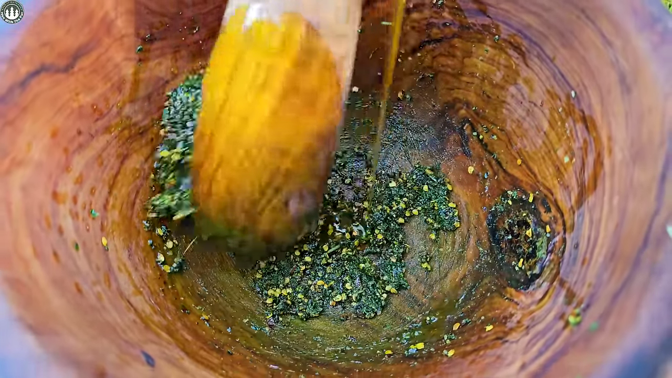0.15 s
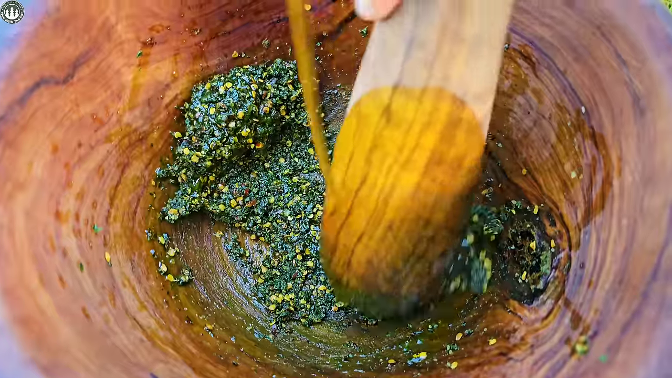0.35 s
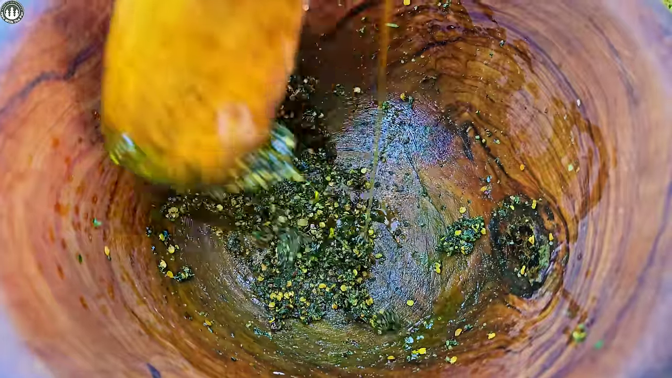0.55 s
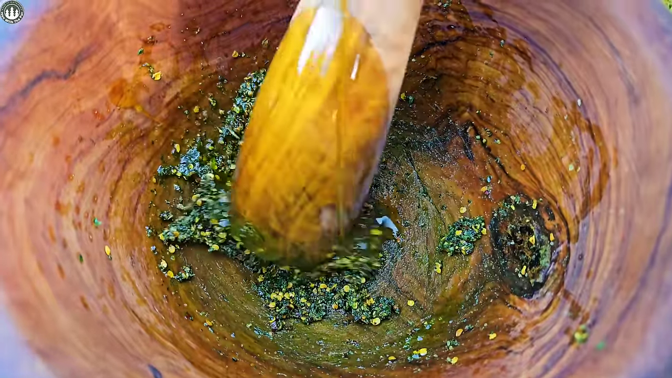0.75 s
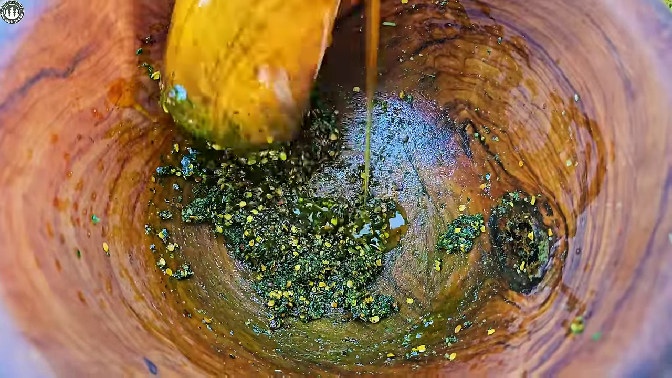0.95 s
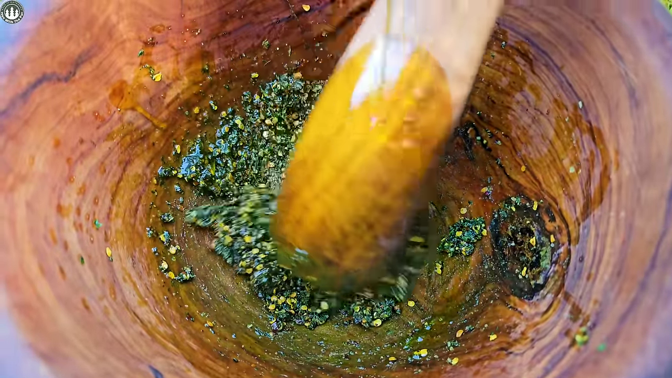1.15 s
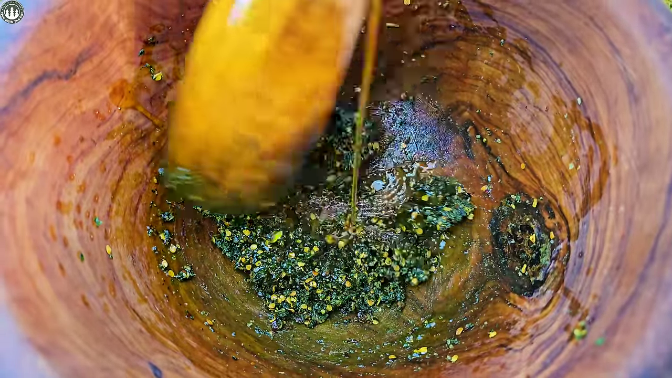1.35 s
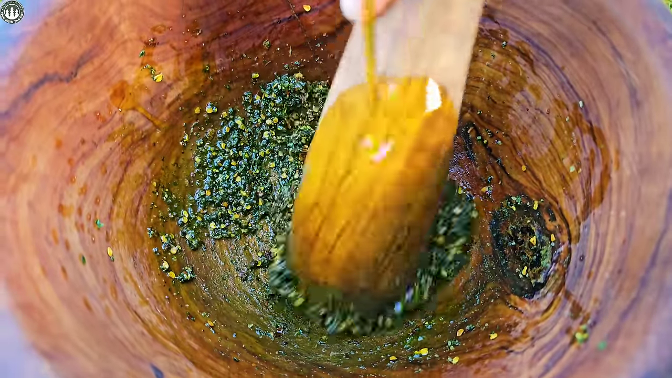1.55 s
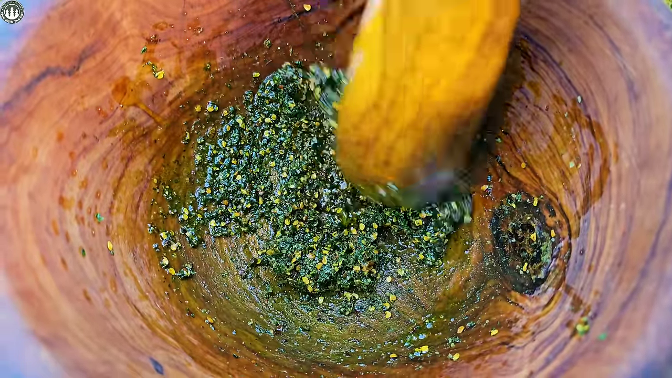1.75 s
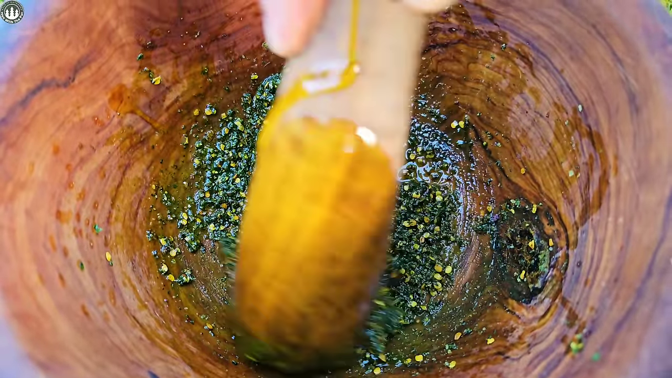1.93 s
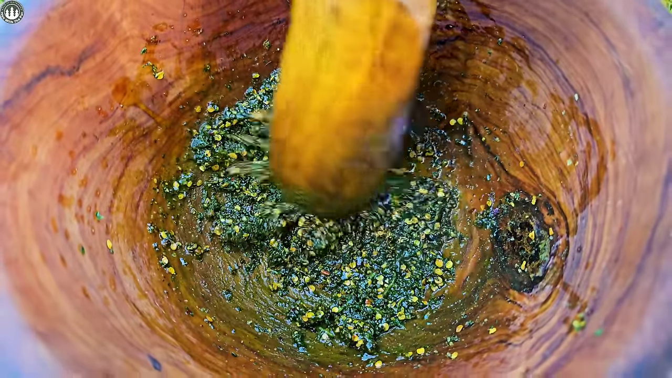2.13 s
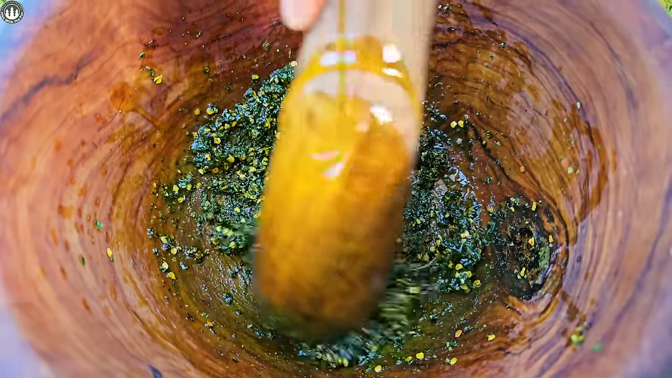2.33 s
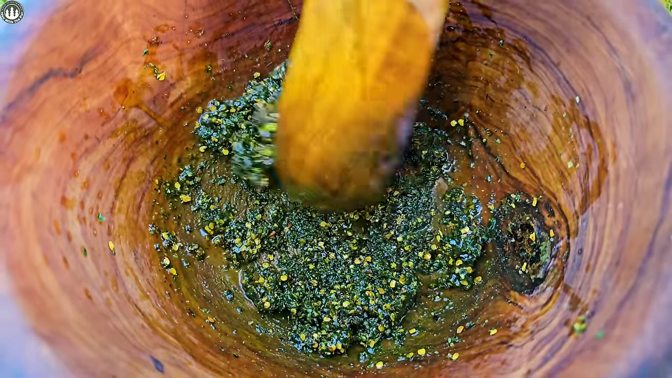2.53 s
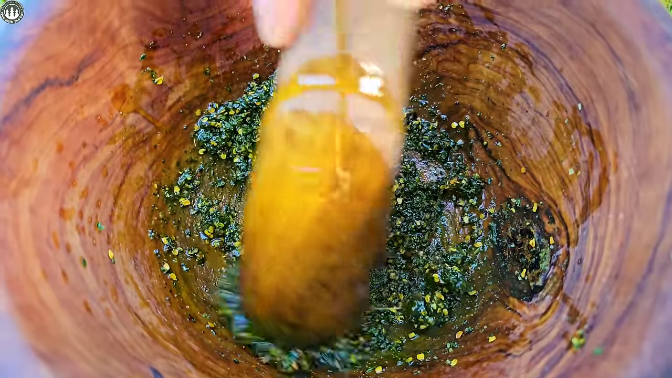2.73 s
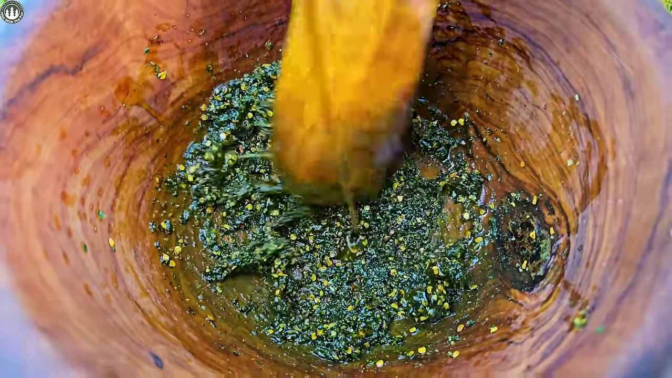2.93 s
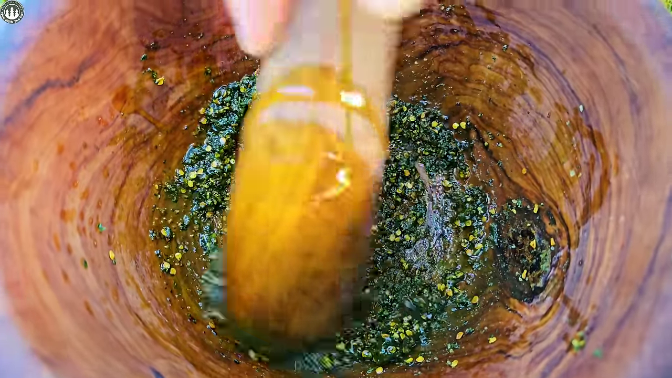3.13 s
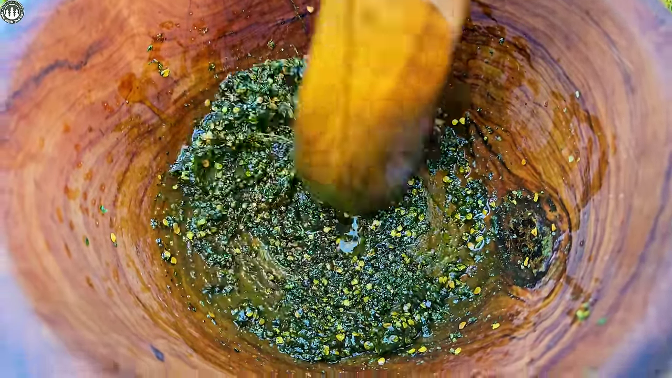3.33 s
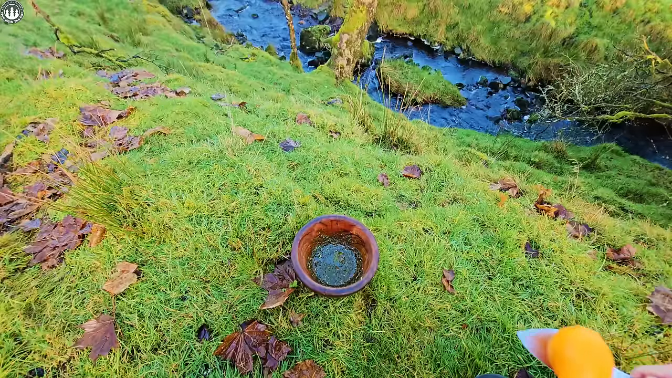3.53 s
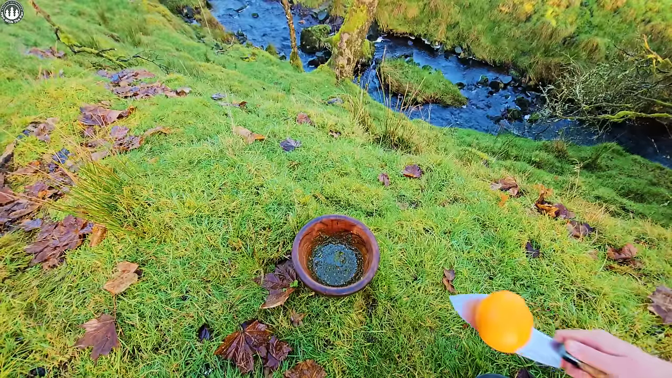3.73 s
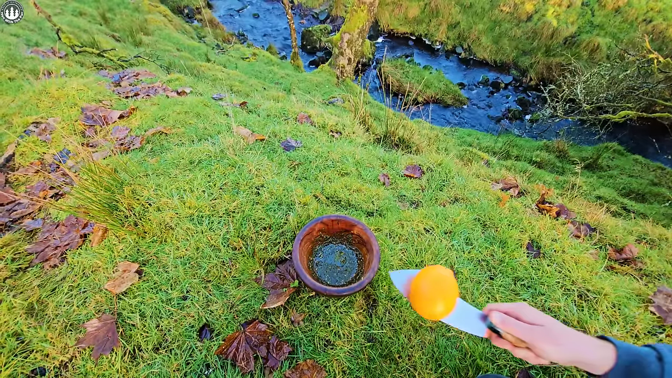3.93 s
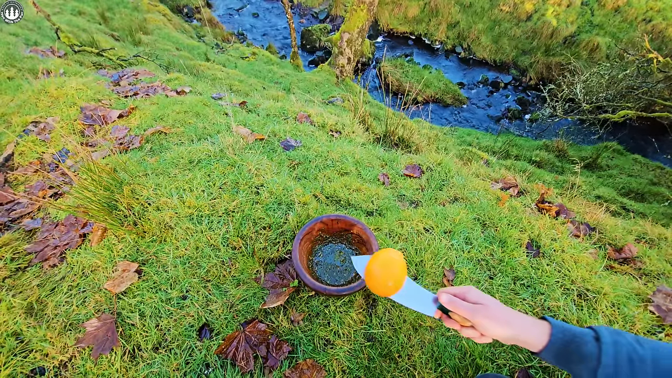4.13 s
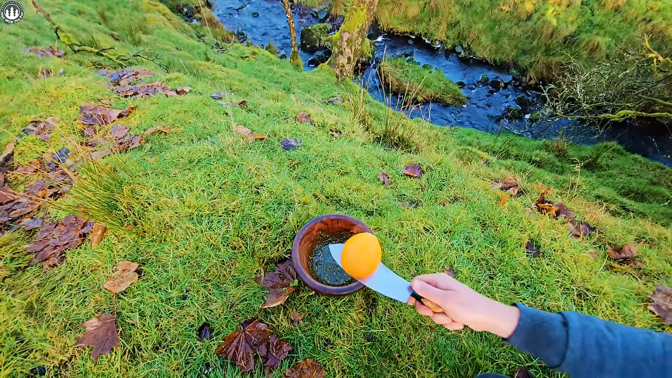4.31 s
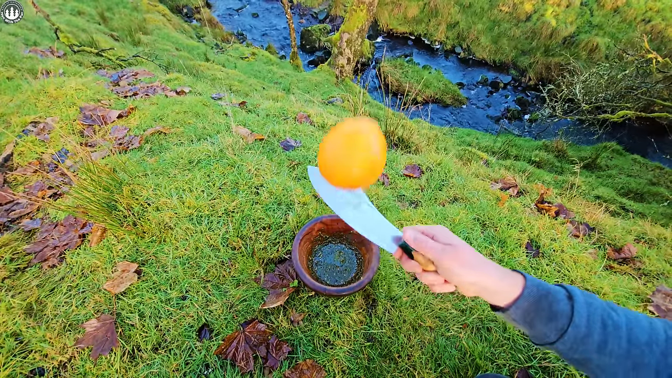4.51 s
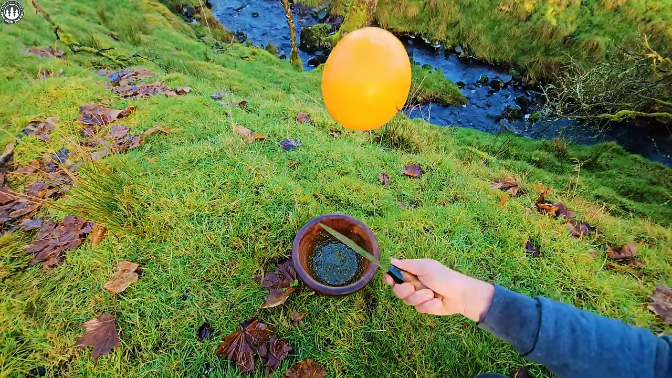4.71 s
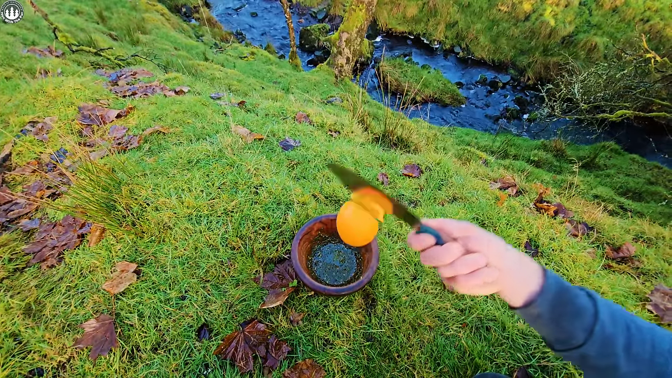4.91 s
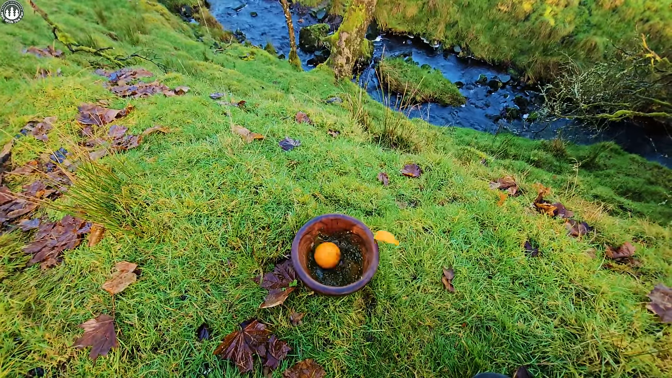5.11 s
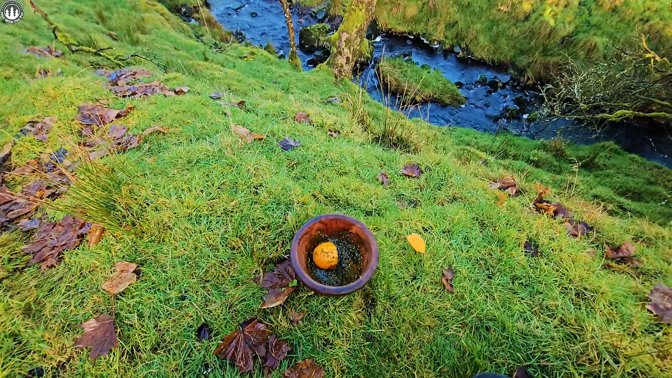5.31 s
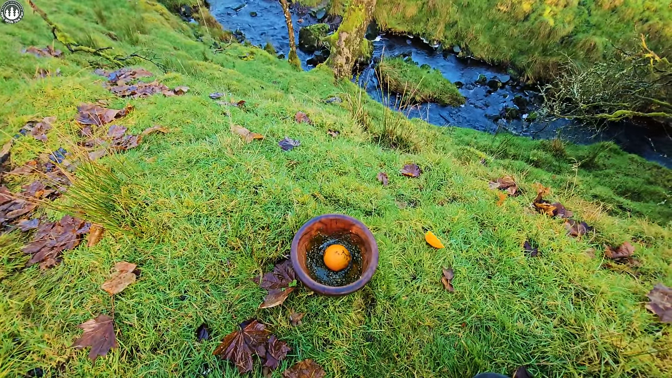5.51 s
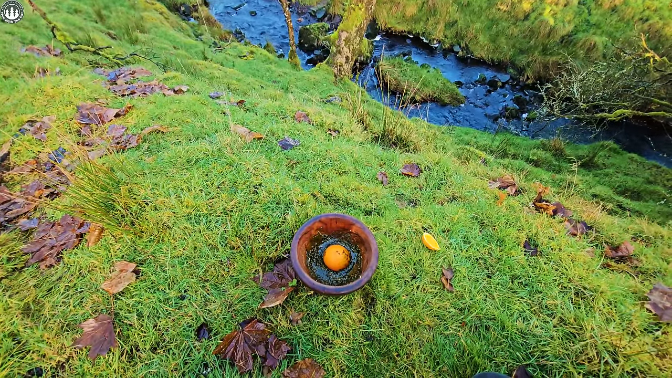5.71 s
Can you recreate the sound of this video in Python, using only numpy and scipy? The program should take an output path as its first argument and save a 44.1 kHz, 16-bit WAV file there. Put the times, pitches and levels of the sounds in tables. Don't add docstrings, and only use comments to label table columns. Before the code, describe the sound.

Outdoors beside a small brook, close-miked irregular grinding: short rough scrapes, soft hollow bumps, cracking seeds and three harder wooden knocks early on. After the pestle lifts, only water rush and low gulps remain for over a second. A wet, snappy fruit cut follows, then a plop into the bowl with light taps, then water alone.

```python
import sys
import numpy as np
from scipy import signal
from scipy.fft import rfft, irfft, next_fast_len
from scipy.io import wavfile
from scipy.ndimage import uniform_filter1d, map_coordinates

SR = 44100
rng = np.random.default_rng(int(sys.argv[2]) if len(sys.argv) > 2 else 0)


def unload_wav(signal):
    wavfile.write(
        sys.argv[1],
        SR,
        np.round(np.clip(np.atleast_2d(signal).T, -1, 1) * 32767).astype(np.int16),
    )


def gain_from_decibels(decibels):
    exponent = np.asarray(decibels, float) / 20
    return 10 ** exponent


N = 258418
TIME_S = np.arange(N) / SR
LEFT_LAG_S = -14 / 44100
HALVES = np.array([[.5], [-.5]])


def unit(x):
    return x / np.sqrt(np.mean(x ** 2) + 1e-20)


def along(points, hz):
    f, value = np.transpose(points)
    return np.interp(np.log(hz + 1), np.log(f + 1), value)


def over_time(points):
    s, value = np.transpose(points)
    return np.interp(TIME_S, s, value)


def wobble(rate_hz):
    knots = rng.standard_normal(N // 100 + 4)
    return map_coordinates(knots, [np.arange(N) * min(rate_hz, 400) / SR])


def filtered(x, response):
    m = next_fast_len(N + 8192)
    return irfft(rfft(x, m) * response(np.fft.rfftfreq(m, 1 / SR)), m)[..., :N]


def shaped(x, points):
    return filtered(x, lambda hz: gain_from_decibels(along(points, hz)))


def modes(table):
    def response(f):
        total = 0
        for k, (hz, width_hz, db) in enumerate(table):
            damping = 1j * f * width_hz
            total = total + (-1) ** k * gain_from_decibels(db) * damping / (hz * hz - f * f + damping)
        return total
    return response


def grit(count, spread_db):
    train = np.zeros((2, N))
    uneven = np.minimum(rng.exponential(size=(2, count)), 4)
    size = rng.standard_normal((2, count)) * gain_from_decibels(spread_db * uneven)
    np.put_along_axis(train, rng.integers(N, size=(2, count)), size, axis=1)
    return unit(train)


def separately(table, count, spread_db, rate_hz, depth_db):
    total = 0
    for hz, width_hz, db in table:
        swell = gain_from_decibels(db + depth_db * wobble(rate_hz))
        b, a = signal.iirpeak(hz, hz / width_hz, SR)
        total = total + swell * signal.lfilter(b, a, grit(count, spread_db))
    return total


def lagged(pair, lag_s):
    return filtered(pair, lambda hz: np.exp(-2j * np.pi * hz * lag_s * HALVES))


def stereo(pair, alike, side, lag_s):
    def share(hz):
        turn = np.arccos(np.clip(along(alike, hz), -1, 1)) / 2
        return np.array([np.cos(turn), np.sin(turn)])
    mid, diff = filtered(pair, share)
    ports = filtered(np.array([mid + diff, mid - diff]), lambda hz: gain_from_decibels(HALVES * along(side, hz)))
    return lagged(ports, lag_s)


def onset(t, attack_s):
    return 1 - np.exp(-t / attack_s)


def ring(t, hz, t60_s, attack_s):
    return np.sin(2 * np.pi * hz * t) * gain_from_decibels(-60 * t / t60_s) * onset(t, attack_s)


def burst(t, hz, width, t60_s):
    noise = rng.standard_normal((3, len(t)))
    force = (noise[0] + 1.02 * noise[1:]) * gain_from_decibels(-60 * t / t60_s) * onset(t, 0.000067)
    force[:, 4:9] += 1.6
    f = np.fft.rfftfreq(len(t), 1 / SR)
    sound = irfft(rfft(force) * modes([(hz, width * hz, 0)])(f), len(t))
    return sound / np.abs(sound).max()


def add(out, s, sound):
    start = round(s * SR)
    out[..., start:start + sound.shape[-1]] += sound[..., :N - start]


# hz, likeness; hz, left_right_db
NEAR_ALIKE = [(100, 1), (600, 1), (1500, 0.051), (4000, 0.058), (12000, 0.05)]
NEAR_SIDE = [(60, 5.5), (110, 2), (200, 5), (380, 5.5), (700, 3.5), (1290, 3), (2380, 5.5), (4400, 4),
             (8120, 11), (15000, 10)]
# hz, db_per_hz
PUSH_SPECTRUM = [(12, -37), (20, -10), (80, 6), (124, 3), (151, 5.5), (293, -1.5), (380, -5), (490, -4),
                 (840, -120)]
CRUNCH_SPECTRUM = [(530, -52), (900, -53), (1190, -7.5), (1660, -14.5), (2170, 1.5), (2420, -8),
                   (3730, -2.5), (7770, -11.5), (10500, -20), (14900, -13), (16000, -14)]
# hz, width_hz, level_db
WOOD_MODES = [(1190, 120, -0.5), (1854, 350, -3.5), (2200, 110, 3), (2490, 55, -1), (3100, 260, -2),
              (3580, 200, -4), (4400, 730, -9.5)]
WET_POPS = [(3000, 240, 4.5), (3530, 1500, 3), (4800, 720, 0.5), (7500, 460, 2.5), (9900, 2400, -2.5)]
# time_s, crunch_db
PASTE = [(0, 2), (.5, 4), (1.2, -2), (1.6, 4), (1.9, 2.5), (2.3, -0.5), (2.6, -0.5), (3, -3.5), (3.5, 0.5)]
LIFT_S = 3.575


def grinding():
    slide_db, weight_db = strokes()
    judder = wobble(27.7)

    push = shaped(grit(count=3000, spread_db=-2.0), PUSH_SPECTRUM)
    push = unit(push * gain_from_decibels(2.0 * judder + 1.3 * wobble(9.9)))
    bowl = filtered(grit(count=5000, spread_db=2.5), modes([(530, 82, 12), (666, 150, -12.5)]))
    bowl = unit(bowl * gain_from_decibels(2.2 * judder))
    scrape = separately(WOOD_MODES, count=5000, spread_db=2.8, rate_hz=18, depth_db=4.2)
    scrape = unit(scrape * gain_from_decibels(1.8 * judder))
    rasp = unit(shaped(grit(count=25000, spread_db=-0.5), CRUNCH_SPECTRUM))
    pops = unit(separately(WET_POPS, count=2500, spread_db=2, rate_hz=22, depth_db=3.5))
    crunch = unit((rasp + .85 * pops) * gain_from_decibels(1.3 * judder + 1.3 * wobble(120)))

    push_db, scrape_db, crunch_db = -2.5, -0.5, -0.5
    grip_db, settle_db = -46, -52
    crunch_drive_db = 0.42 * (slide_db + 40) - 40
    push_level = np.hypot(gain_from_decibels(push_db + weight_db), gain_from_decibels(grip_db))
    crunch_level = np.hypot(gain_from_decibels(crunch_db + over_time(PASTE) + crunch_drive_db), gain_from_decibels(settle_db))
    pair = push_level * push + gain_from_decibels(weight_db) * bowl
    pair = pair + gain_from_decibels(slide_db + scrape_db) * scrape + crunch_level * crunch

    fade = np.clip((LIFT_S - TIME_S) / 0.0096, .22, 1) * (TIME_S < LIFT_S + .065)
    for s, *_ in KNOCKS:
        fade *= 1 - 0.14 * np.exp(-((TIME_S - s + 0.048) / 0.0084) ** 2)
    return stereo(fade * pair, NEAR_ALIKE, NEAR_SIDE, LEFT_LAG_S)


# start_s, length_s, slide_db, weight_db
STROKES = [(-.02, 0.066, -38, -34), (0.061, 0.075, -34, -39), (0.125, 0.03, -43.5, -48),
           (0.153, 0.038, -35.5, -44), (0.185, 0.043, -38, -43.5), (0.223, 0.081, -47.5, -45.5),
           (0.294, 0.036, -28.5, -27.5), (0.333, 0.057, -34.5, -33.5), (0.407, 0.064, -47, -44.5),
           (0.749, 0.074, -37.5, -41), (0.858, 0.044, -42, -59), (1.112, 0.089, -38, -43),
           (1.197, 0.085, -45, -45), (1.25, 0.06, -35, -31), (1.472, 0.2, -49, -45),
           (1.674, 0.082, -53, -41.5), (1.786, 0.064, -67, -54), (1.826, 0.035, -42, -47),
           (1.854, 0.055, -44.5, -46), (1.907, 0.057, -45.5, -42), (1.943, 0.085, -48, -47),
           (2.029, 0.072, -39, -36.5), (2.092, 0.034, -33.5, -34), (2.137, 0.069, -43, -42),
           (2.202, 0.06, -37.5, -42.5), (2.256, 0.06, -36.5, -38.5), (2.325, 0.043, -40.5, -44),
           (2.375, 0.056, -53, -54), (2.429, 0.1, -45, -52), (2.521, 0.026, -40, -46),
           (2.558, 0.039, -47, -47.5), (2.596, 0.07, -38.5, -44.5), (2.667, 0.08, -36, -41.5),
           (2.727, 0.04, -43.5, -40.5), (2.772, 0.038, -47, -52), (2.802, 0.054, -42, -49.5),
           (2.839, 0.097, -38, -41), (2.907, 0.084, -42, -45.5), (2.983, 0.036, -39, -37.5),
           (3.009, 0.051, -32, -34.5), (3.073, 0.047, -37.5, -39), (3.116, 0.066, -41, -39.5),
           (3.192, 0.045, -44, -45), (3.242, 0.021, -32, -32), (3.27, 0.11, -42.5, -42),
           (3.34, 0.032, -35.5, -38), (3.381, 0.07, -42, -39), (3.436, 0.052, -36, -34.5),
           (3.486, 0.17, -37.5, -34.5)]


def strokes():
    attack_s, release_s = 0.025, 0.036
    s, length, slide_db, weight_db = np.transpose(STROKES)[..., None]
    t = np.arange(0, N, 32) / SR
    rise = (t - s) / attack_s + .5
    fall = (s + length - t) / release_s + .5
    shape = np.clip(np.minimum(rise, fall), 0, 1) ** 2
    levels = []
    for db in (slide_db, weight_db):
        power = np.sum((shape * gain_from_decibels(db)) ** 2, axis=0)
        levels.append(np.interp(TIME_S, t, 10 * np.log10(power + 1e-9)))
    return levels


def bass_cut(pair):
    return filtered(pair, lambda hz: 1j * hz / (45 + 1j * hz))


# start_s, bowl_hz, bowl_db, crack_db, thud_db
KNOCKS = [
    (0.6759, 474, -15, -6, -3.5),
    (1.0416, 489, -4.5, -21, -2.5),
    (1.4726, 473, -20, -20, -1.5),
]
# hz, level_db, t60_s
STRUCK = [
    [(1144, -23, 0.03), (1530, -14, 0.013), (2000, -1, 0.012), (2330, -9, 0.009), (3000, -3, 0.013),
     (3500, -10, 0.015), (4650, -16, 0.011)],
    [(800, -0.5, 0.0088), (1235, -11, 0.021), (2060, -10.5, 0.023), (2450, -13, 0.021), (3100, -9.5, 0.016),
     (5000, -28, 0.012)],
    [(1100, -18.5, 0.013), (2060, -22.5, 0.024), (2750, -12, 0.019), (3100, -11, 0.018),
     (4600, -13.5, 0.01), (6060, -22, 0.0065), (8000, -14, 0.0088)],
]
THUD_LAG_S = [0.0019, 0.001, 0.0016]
# hz, likeness; hz, left_right_db
KNOCK_ALIKE = [(200, 0.66), (600, 1), (2000, 0.33), (10000, 0.2)]
KNOCK_SIDE = [(60, 1), (180, -4.5), (550, 1.5), (1650, 12), (4970, 8.5), (15000, 12)]


def knocks():
    out, t = np.zeros((2, N)), np.arange(SR // 5) / SR
    crack_response = modes([(3300, 5500, 3)])(np.fft.rfftfreq(len(t), 1 / SR))
    for (s, hz, bowl_db, crack_db, thud_db), wall_modes, lag_s in zip(KNOCKS, STRUCK, THUD_LAG_S):
        glide_hz = hz * (1 + 0.11 * np.exp(-t / 0.0095))
        hollow = gain_from_decibels(bowl_db + 6.0) * ring(t, glide_hz, 0.081, 0.0076)
        thud = gain_from_decibels(thud_db) * ring(np.maximum(t - lag_s, 0), 167, 0.014, 0.0022)
        wall = sum(gain_from_decibels(db) * ring(t, f, t60_s, 0.0018) for f, db, t60_s in wall_modes)
        crack = irfft(crack_response * rfft(rng.standard_normal((2, len(t)))), len(t))
        crack = crack * gain_from_decibels(-60 * t / 0.01) * onset(t, 0.00039)
        add(out, s, (hollow + thud + wall) * [[1], [-.05]] + gain_from_decibels(crack_db) * crack)
    return bass_cut(stereo(out, KNOCK_ALIKE, KNOCK_SIDE, 0.58 * LEFT_LAG_S))


# start_s, peak_db, bowl_hz, thud_db
BUMPS = [(0.05, -18.5, 527, -29), (0.099, -21.5, 490, -10), (0.304, -24, 560, -12),
         (0.339, -12.5, 550, -27), (0.36, -19, 574, -21), (0.811, -21, 530, -26), (1.152, -24.5, 550, 7),
         (1.189, -26.5, 626, -7), (1.257, -19, 530, -10), (1.268, -22, 520, -6), (1.281, -28, 480, 2),
         (1.295, -22, 600, 6.5), (1.559, -19, 522, -26), (1.699, -27, 617, 6), (1.734, -23, 470, -15),
         (1.999, -28, 533, -2), (2.041, -23, 553, 2), (2.069, -27, 552, -10), (2.1003, -18.5, 483, 8.5),
         (2.28, -26.5, 544, -10), (2.535, -28, 500, -10), (2.617, -29, 520, -3), (2.861, -30, 550, -12),
         (2.921, -24, 565, -5), (3.003, -25, 530, 0), (3.041, -26, 456, 2.5), (3.076, -25.5, 600, -17),
         (3.132, -29, 590, -14), (3.245, -18, 530, -14), (3.052, -27.5, 500, 12), (3.081, -29.5, 510, 15),
         (3.275, -24, 530, 1), (3.304, -24, 535, -3), (3.318, -21, 540, 0), (3.36, -24, 450, -3),
         (3.392, -24, 550, 6), (3.447, -24, 410, 6.5), (3.49, -38, 522, -1), (3.528, -24, 510, 5),
         (3.544, -43, 546, 1), (3.557, -22.5, 530, -18), (3.608, -26.5, 555, -15)]


def bumps():
    out, t = np.zeros((2, N)), np.arange(SR // 5) / SR
    for s, db, hz, thud_db in BUMPS:
        thud_hz = 130 * gain_from_decibels(rng.normal(0, 2.6))
        sound = ring(t, hz, 0.03, 0.0015) + gain_from_decibels(thud_db) * ring(t, thud_hz, 0.019, 0.001)
        add(out, s - .001, gain_from_decibels(db + 1.0) * sound * [[1], [0]])
    return bass_cut(stereo(out, NEAR_ALIKE, NEAR_SIDE, 0.57 * LEFT_LAG_S))


def bursts(events, gain_db, width, t60_s):
    out, t = np.zeros((2, N)), np.arange(2048) / SR
    for s, db, hz, pan_db in events:
        add(out, s, gain_from_decibels(db + gain_db) * burst(t, hz, width, t60_s) * gain_from_decibels(pan_db * HALVES))
    return lagged(out, LEFT_LAG_S)


# start_s, peak_db, centre_hz, left_right_db
SEEDS = [(0.174, -16, 5040, 10), (0.3164, -32, 3930, 11), (0.3166, -14, 4840, 4), (0.341, -17, 5400, 7),
         (0.309, -26, 3300, 6), (0.365, -17, 3300, 10), (0.798, -17, 3970, 1), (1.5337, -17.5, 3650, 8),
         (1.553, -24, 4200, 7), (1.565, -23, 3500, 7), (1.855, -23, 3500, 9), (2.1033, -8.5, 4600, 3),
         (2.337, -31, 6500, 10), (2.5355, -23, 3920, 7), (2.615, -17, 5170, 9), (2.621, -21, 4000, 6),
         (2.8112, -16, 3750, 11), (3.015, -20, 3900, 10), (3.084, -16, 3760, 12), (3.1185, -20.5, 3880, 18),
         (3.1572, -25, 4350, 10), (3.223, -19.5, 7200, 14), (3.252, -17, 3780, 10), (3.286, -20, 4980, 10),
         (3.321, -9, 4580, 4), (3.34, -27, 4790, 17), (3.391, -23, 4230, 1), (3.4336, -24, 4360, 15),
         (3.462, -22, 4320, 19), (3.531, -24, 4740, 23), (3.557, -20, 4820, 9)]


def seeds():
    return bursts(SEEDS, gain_db=-4.0, width=0.21, t60_s=0.016)


# start_s, peak_db, centre_hz
TICKS = [(0.011, -19, 12500), (0.2615, -33, 7000), (0.3415, -14, 11000), (0.6025, -40, 12500),
         (0.7472, -37, 8900), (0.8659, -41, 7000), (0.9243, -30, 9500), (1.281, -24, 7500),
         (1.3598, -35, 8000), (1.4525, -35, 8000), (1.47, -33, 14500), (1.5125, -37, 7000),
         (1.5328, -25, 8200), (1.546, -27, 9000), (1.5843, -27, 7200), (1.6057, -30, 8000),
         (1.9235, -29, 7000), (2.038, -28, 13500), (2.059, -30, 13500), (2.107, -26, 12000),
         (2.1755, -34, 12000), (2.346, -30, 11000), (2.394, -36, 7500), (2.409, -31, 7500),
         (2.5681, -32, 7000), (2.6185, -33, 8000), (2.978, -27, 5000), (3.1332, -21, 7000),
         (3.229, -21, 5000), (3.3752, -36, 8000), (3.41, -31, 5500)]


def husks():
    return bursts([(*tick, 7.8) for tick in TICKS], gain_db=-0.5, width=0.36, t60_s=0.0081)


# start_s, peak_db, ring_hz
TAPS = [(0.1012, -27, 2120), (0.166, -34, 2900), (0.3066, -24, 3070), (0.3373, -27, 3000),
        (0.363, -22, 2300), (1.499, -33, 2120), (1.7007, -34, 1220), (1.717, -33, 3200),
        (0.702, -38.5, 3100), (1.462, -40, 3100), (1.864, -26, 2200), (1.886, -27.5, 2200),
        (2.04, -27, 3020), (2.2178, -25, 2150), (2.246, -29, 3370), (2.283, -32.5, 3500),
        (2.6855, -31, 1174), (2.7106, -35, 1180), (2.707, -28.5, 2270), (2.9071, -42, 1170),
        (3.0507, -35, 1310), (3.101, -25, 2260), (3.133, -35, 1290), (3.2452, -24.5, 2150),
        (3.2508, -28, 3000), (3.3885, -24, 1820), (3.416, -43, 1160), (3.463, -30, 2200),
        (3.502, -29, 2150), (2.8113, -25.5, 3820), (3.019, -26.5, 3100), (3.0433, -19.5, 3760),
        (3.0533, -22.5, 2180), (3.052, -22.5, 3500), (3.0804, -19.5, 2200), (3.1323, -29, 2180),
        (3.2435, -22, 3100), (3.275, -27.5, 3530), (3.3194, -28, 2130), (3.3897, -27, 3120),
        (3.454, -21, 2190), (3.53, -29, 2060), (3.5547, -28, 2630), (3.6077, -33, 3100)]


def grit_taps():
    return bursts([(*tap, 6.4) for tap in TAPS], gain_db=1.5, width=0.075, t60_s=0.041)


# start_s, body_db, body_hz, spray_db, t60_s
ORANGE = [(5.0036, -7, 1510, -23, 0.029), (5.0042, -16.5, 830, -36, 0.019), (5.005, -22, 480, -38, 0.026),
          (5.015, -22, 525, -40, 0.025), (5.009, -28, 2000, -37, 0.0077), (5.0082, -7.5, 1100, -33, 0.0052),
          (5.0134, -14.5, 800, -10.5, 0.02), (5.014, -9.5, 1710, -26, 0.015),
          (5.014, -19, 3640, -30, 0.015), (5.0175, -29, 1300, -31, 0.022), (5.144, -33, 1380, -30, 0.008),
          (5.161, -34, 1500, -24, 0.027), (5.1667, -2.5, 1420, -5, 0.01), (5.1671, -15, 685, -30, 0.024),
          (5.1687, -13, 1520, -26, 0.01), (5.1715, -14, 1780, -29, 0.016), (5.1745, -12, 2200, -28, 0.018),
          (5.179, -25, 1990, -17, 0.011), (5.185, -21, 2200, -19, 0.0084), (5.229, -30, 3800, -24, 0.017),
          (5.2405, -22, 3500, -42, 0.013), (5.242, -22, 4280, -42, 0.012), (5.248, -26, 4300, -40, 0.008),
          (5.267, -29, 2200, -50, 0.013), (5.056, -34, 4300, -42, 0.01), (5.028, -33, 1500, -39, 0.0081),
          (5.241, -22, 1950, -45, 0.015), (5.249, -27, 1750, -34, 0.017),
          (5.2755, -18.5, 3600, -32, 0.0038), (5.1666, -40, 425, -40, 0.01)]
# hz, level_db
SPRAY = [(1500, -16), (3000, -11), (6000, -1), (9000, -4), (12000, -7), (16000, -10)]


def orange():
    body, spray, t = np.zeros((2, N)), np.zeros((2, N)), np.arange(2048) / SR
    for s, body_db, hz, spray_db, t60_s in ORANGE:
        thump = 0.49 * burst(t, hz, 0.44, t60_s * 1.4) - 1.16 * ring(t, hz, t60_s * 0.4, 0.00058)
        add(body, s, gain_from_decibels(body_db) * thump)
        hiss = rng.standard_normal((2, len(t))) * gain_from_decibels(-60 * t / t60_s) * onset(t, 0.00097)
        add(spray, s, gain_from_decibels(spray_db) * hiss)
    return (body + shaped(spray, SPRAY)) * gain_from_decibels(5.6 * HALVES)


# time_s, level_db
BROOK_SPECTRUM = [(12, -46), (20, -12.5), (91, -4.5), (113, -0.5), (146, -3.5), (262, -2), (357, -21.5),
                  (388, -14), (759, -9), (1120, -14), (1570, -11.5), (2670, -18.5), (4180, -20),
                  (14300, -30.5), (16000, -34)]
BROOK_DB = [(0.0, -57), (0.83, -59.5), (2.25, -55), (2.64, -58.5), (3.15, -52.5), (5.48, -53),
            (5.86, -53.5)]
# hz, width_hz, level_db
BURBLE = [(635, 290, -4), (1300, 140, -1.5), (1930, 200, -6.5)]
# hz, likeness; hz, left_right_db
BROOK_ALIKE = [(60, 1), (130, 1), (290, 0.88), (640, 0.87), (1410, -0.35), (3100, 0.46), (6820, 0.051),
               (15000, -0.38)]
BROOK_SIDE = [(60, -1.5), (110, 2), (200, 0), (380, 2.5), (700, 2), (1290, 4.0), (2380, 4), (4400, -6),
              (8120, 6.5), (15000, 3)]
# start_s, level_db, pitch_hz, t60_s
GULPS = [
    (5.262, -31, 250, 0.15),
    (3.63, -32.5, 220, 0.26),
    (3.72, -27.5, 250, 0.14),
    (4.2, -30, 131, 0.068),
]


def brook():
    hz, _, z = signal.stft(rng.standard_normal((2, N)), SR, nperseg=512)
    patches = uniform_filter1d(rng.standard_normal(z.shape[1:]), size=5, axis=0)
    patches = unit(uniform_filter1d(patches, size=10, axis=1))
    depth_db = 1.3 * np.clip(hz / 600, 0, 1)[:, None]
    rush = signal.istft(z * gain_from_decibels(depth_db * patches), nperseg=512)[1][:, :N]
    rush = unit(shaped(rush, BROOK_SPECTRUM))
    burble = unit(separately(BURBLE, count=900, spread_db=0.7, rate_hz=4.34, depth_db=-0.5))
    water = unit(stereo(rush + 0.43 * burble, BROOK_ALIKE, BROOK_SIDE, -0.00022))
    out = gain_from_decibels(over_time(BROOK_DB) + 11.0 + 0.17 * wobble(8.2)) * water
    t = np.arange(SR // 4) / SR
    for s, db, pitch_hz, t60_s in GULPS:
        add(out, s, gain_from_decibels(db) * ring(t, pitch_hz, t60_s, 0.013))
    return out


def scene():
    mortar = grinding() + knocks() + bumps() + seeds() + husks() + grit_taps()
    return mortar + orange() + brook()


def low_pass(x):
    return signal.sosfilt(signal.butter(12, 16840, fs=SR, output="sos"), x)


# hz, gain_db
PORTS = [(9000, 0.5), (10300, -2.5), (10750, -9), (11200, 0), (12600, -1.5), (14500, 2.5), (15400, 1.5)]


def record(dry):
    ceiling, top_hz = .72, 15520
    x = shaped(dry, PORTS)
    x = x / (1 + np.abs(x / ceiling) ** 6) ** (1 / 6)
    mix = filtered(x, lambda hz: hz < top_hz)
    return low_pass(mix)


dry = scene()
out = record(dry)
unload_wav(out)
```